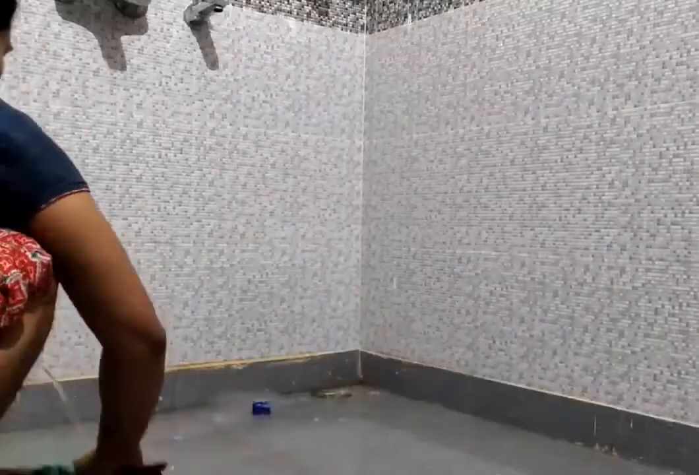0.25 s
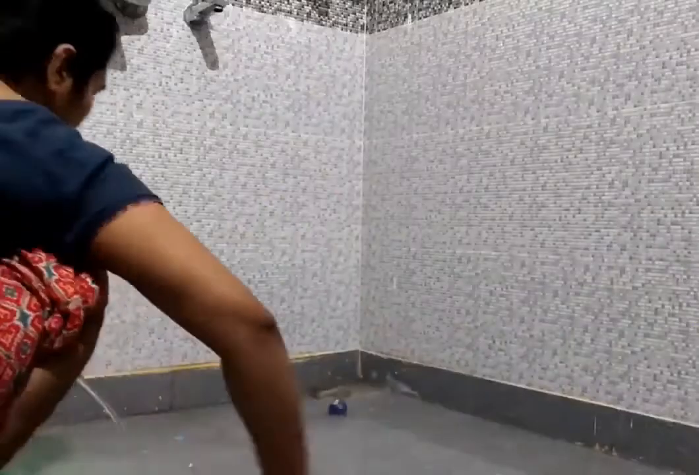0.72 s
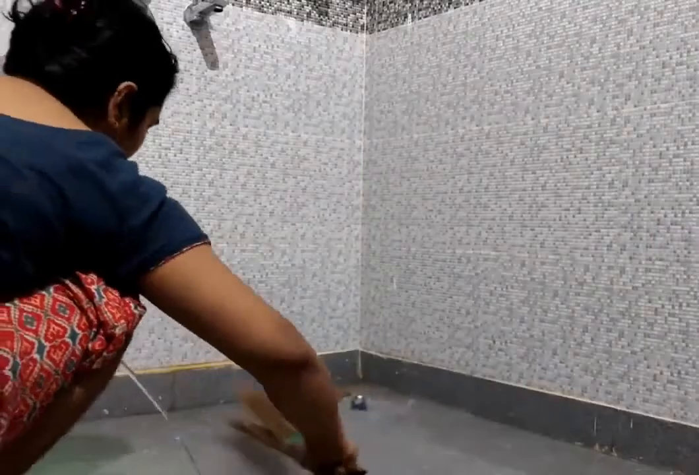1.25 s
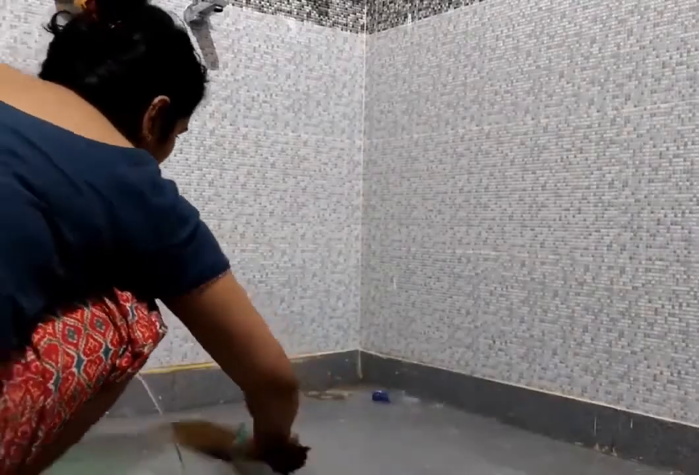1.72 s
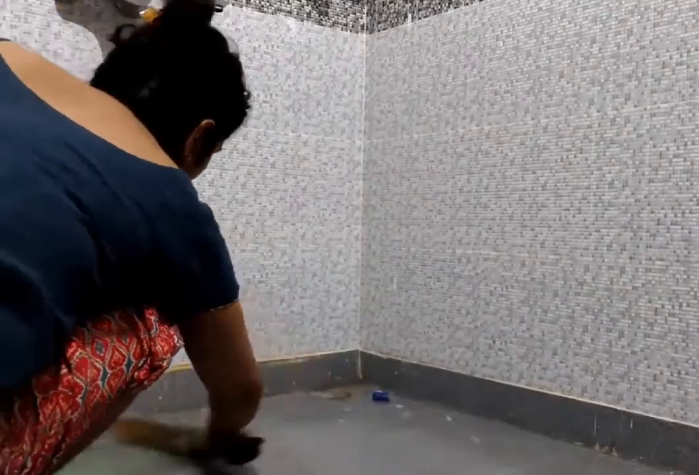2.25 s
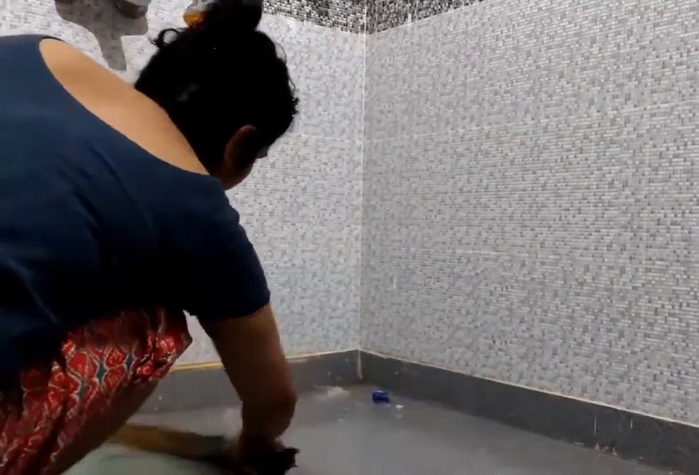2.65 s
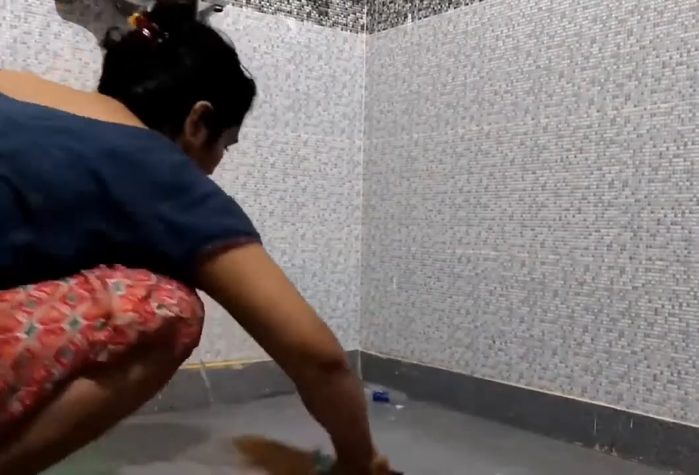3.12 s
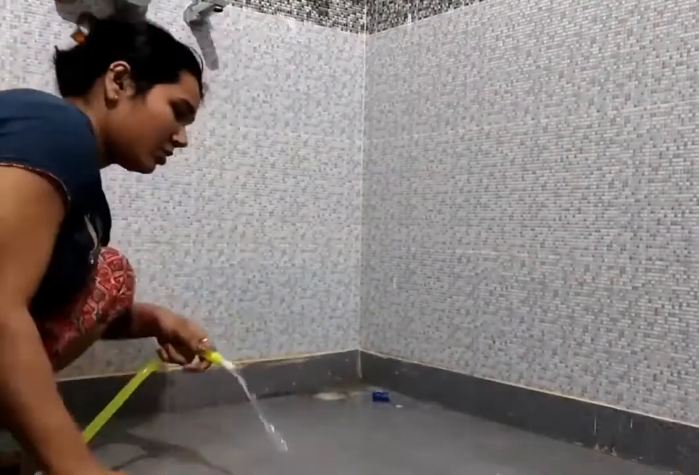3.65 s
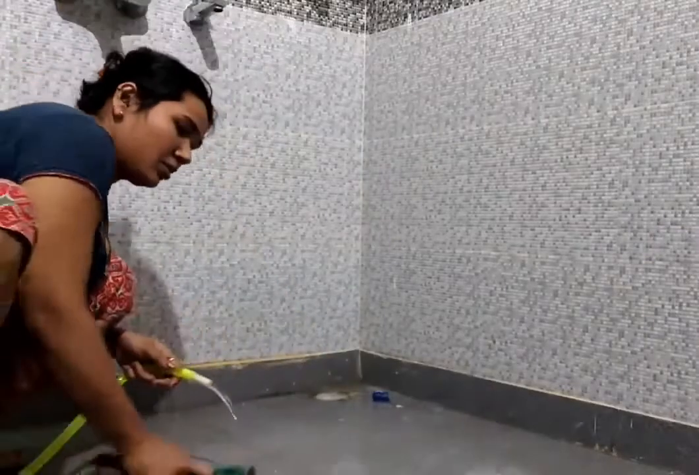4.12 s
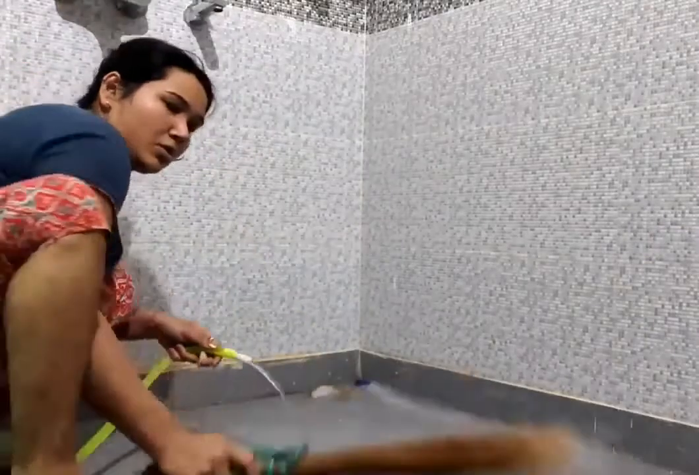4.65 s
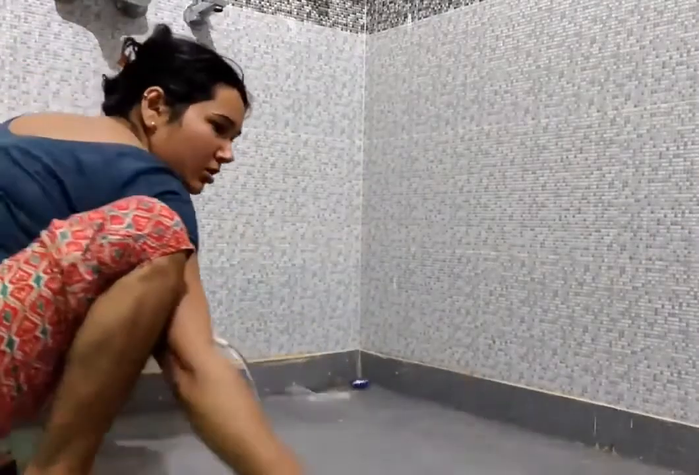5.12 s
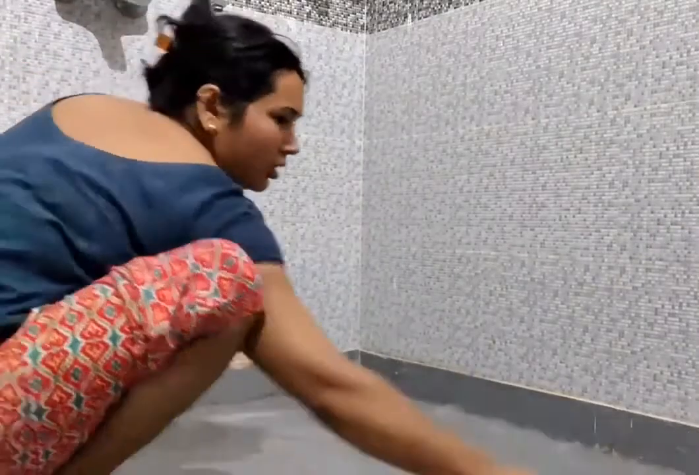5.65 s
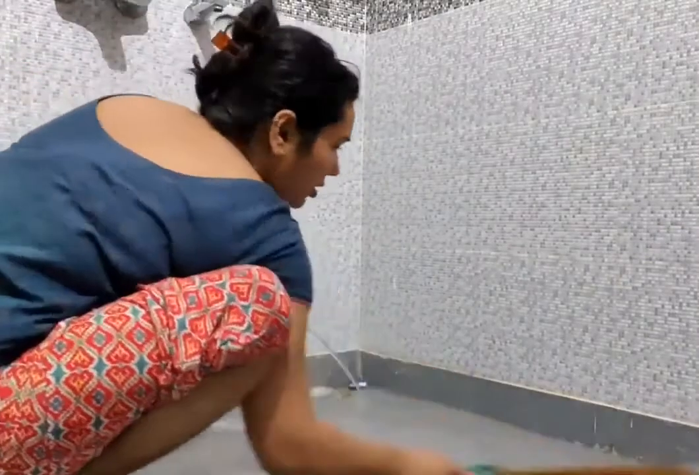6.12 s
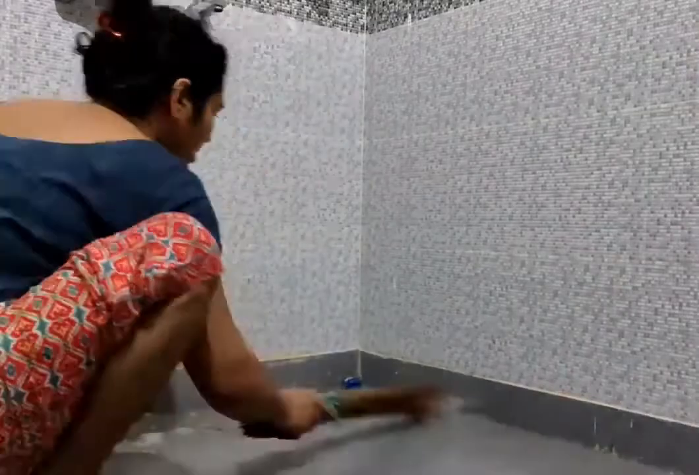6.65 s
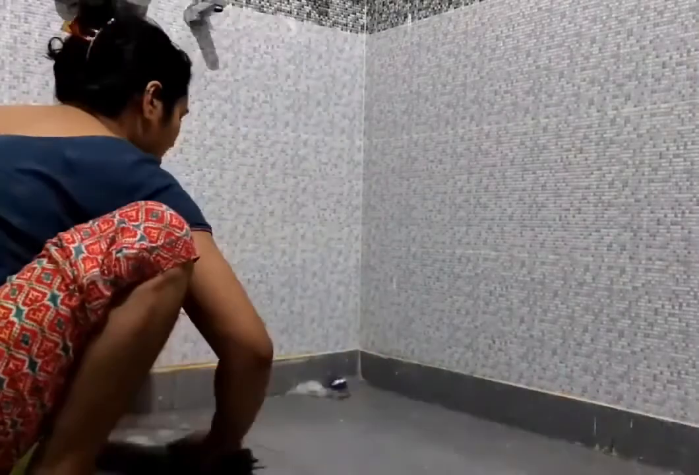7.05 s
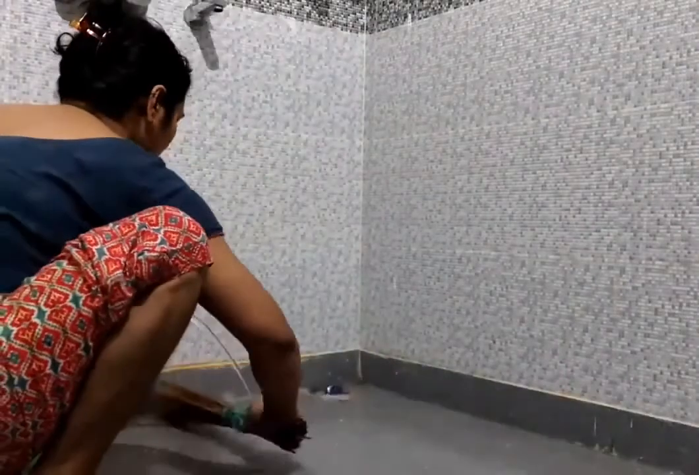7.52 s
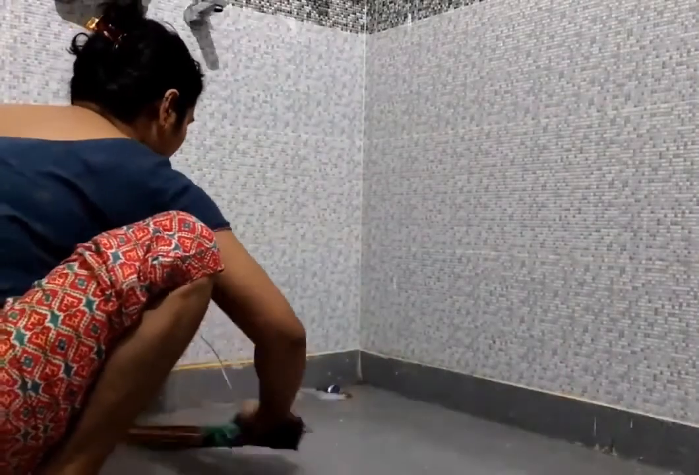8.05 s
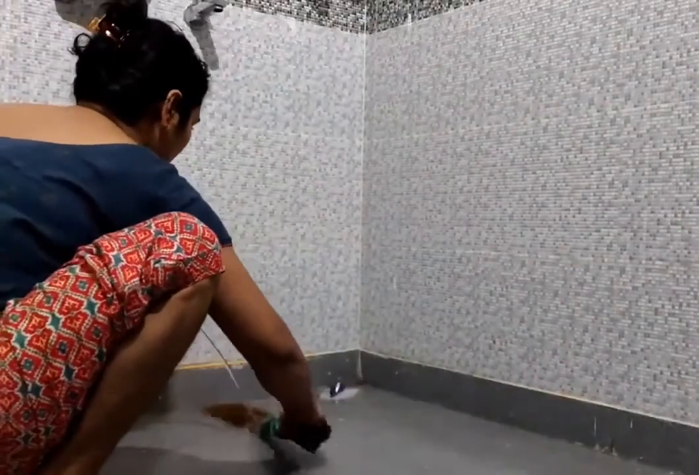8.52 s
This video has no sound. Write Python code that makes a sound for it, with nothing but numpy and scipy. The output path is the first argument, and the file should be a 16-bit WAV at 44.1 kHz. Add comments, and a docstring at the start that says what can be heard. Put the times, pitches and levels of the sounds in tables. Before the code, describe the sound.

A stiff broom scrubs a wet tiled bathroom floor in repeated scratchy strokes, with a faint hose trickle, handle knocks and a low room hum.

```python
"""A stiff broom scrubs a wet tiled bathroom floor in long strokes while a hose trickles beside it.
From the start, thousands of random clicks, shaped by each stroke, make the bristles; pattering
clicks and ringing bubbles make the hose, and decaying noise makes the bare walls ring on.
Three wavering low notes of the room and a rumble hum under it all. Between about 3.4 and 5.1 s two
faint tones swell and fade, and from 3.7 to 5.9 s the handle knocks the floor: low modes and noise."""
import sys
import numpy as np
from scipy import signal
from scipy.fft import rfft, irfft, next_fast_len
from scipy.io import wavfile
from scipy.ndimage import uniform_filter1d, map_coordinates

SR = 44100
rng = np.random.default_rng(int(sys.argv[2]) if len(sys.argv) > 2 else 0)


def generate_wav(signal):
    """Clip the signal to [-1, 1] and save it as 16-bit WAV at the path in sys.argv[1]."""
    frames = np.transpose(np.atleast_2d(signal))
    scaled = np.clip(frames, -1, 1) * 32767
    pcm = np.round(scaled).astype(np.int16)
    wavfile.write(sys.argv[1], SR, pcm)


N = 387638  # length of the scene in samples

# Broom strokes: (bite [s], rise before the bite [s], drag after it [s], extra push in the drag [dB/s],
# low rasp of the pressed bundle [dB], scrub [dB], wet spray on top [dB])
STROKES = [(0.0, .1, 0, 0, -38.5, -25, -36), (.338, 0.23, 0.15, 3, -51, -24, -34),
           (.82, 0.16, 0.31, 1, -46, -23.5, -33.5), (1.603, 0.12, 0.25, -2.5, -45.5, -22.5, -34.5),
           (2.15, 0.14, 0.45, -4.5, -50, -23, -32), (2.69, 0.16, 0.27, -7, -48.5, -25.5, -33.5),
           (3.095, 0.24, 0.12, -1, -42.5, -25.5, -34), (3.791, 0.062, 0.069, 3, -47, -32, -38),
           (3.9, 0.12, 0.36, -1, -46.5, -22, -34), (4.431, 0.45, 0.0043, 7, -45, -34, -40.5),
           (4.915, 0.031, 0, 12, -51.5, -35, -41), (5.035, 0.1, 0.41, 1, -48, -24, -32.5),
           (5.738, 0.064, 0, 1, -37.5, -27, -36.5), (5.9, 0.15, 0.25, 9, -45.5, -25, -35),
           (6.2, 0.29, 0.11, -2, -42.5, -25.5, -39), (6.62, 0.29, 0, 11, -52, -26, -34.5),
           (7.015, 0.09, 0.2, 9, -49, -30.5, -39), (7.23, 0.33, 0.18, -10, -43.5, -26.5, -41.5),
           (7.775, .2, 0.085, 8, -44, -25.5, -36), (8.178, 0.14, 0.11, 14, -46.5, -24.5, -34.5),
           (8.552, 0.25, 0.016, 3, -49, -25.5, -36)]
# Brief digs as the bristles catch in a joint: (time [s], change of the stroke [dB])
DIGS = [(.35, 2), (.4, 2.5), (.86, 2.5), (1.0, -1), (1.15, 0), (1.63, 2.5), (1.75, 0.5), (1.9, 2),
        (2.16, 2), (2.22, -1), (2.65, 3), (2.7, 1), (2.765, 2.5), (2.95, -1), (3.115, 2), (3.155, 0.5),
        (3.2, -4), (3.9, 0.5), (3.979, 1.5), (4.1, 1), (4.27, 2.5), (5.04, -0.5), (5.15, 1.5), (5.28, 0),
        (5.37, 2.5), (5.8, 1), (6.1, -2.5), (6.23, .8), (6.635, 2), (6.67, 2.5), (7.25, 2), (7.45, 3.5),
        (7.84, 3), (8.33, 0.5)]
# Tone colour of the bristle snaps: (frequency [Hz], relative level [dB])
BRISTLE_COLOUR = [(88, -55), (150, -22), (200, -32), (274, -26.5), (345, -24.5), (779, -10.5), (1010, -9),
                  (1270, -5.5), (1380, -6), (2320, -2), (4920, -6), (5990, -9.5), (7400, -6), (9620, -19),
                  (16300, -120)]
# Tone colour of the hose's patter: (frequency [Hz], relative level [dB])
TRICKLE_COLOUR = [(150, -42), (330, -11.5), (500, -9.5), (1200, -31), (1700, -2), (2400, -2), (4900, -8),
                  (7400, -38)]
# How long the walls ring: (frequency [Hz], time to fall by 60 dB [s])
WALL_RING = [(150, 1), (600, 0.37), (2500, 0.62), (7000, 0.12), (15000, 0.014)]
# How alike the echoes are at left and right: (frequency [Hz], likeness [-1 to 1])
ECHO_LIKENESS = [(60, 1), (130, 1), (290, 0.5), (640, 0.33), (1400, -0.28), (3000, 0.0039), (15000, 0.13)]
# Direct sound compared with the echoes: (frequency [Hz], level [dB])
DIRECT = [(500, -7.5), (3000, -13), (7000, -8.5), (15000, -4.5)]
# Tone colour of the deepest noise: (frequency [Hz], relative level [dB])
DEEP_COLOUR = [(10, 0), (22, 8), (32, -6), (45, -20), (75, -23), (120, -18), (200, -34)]
# Tone colour of the distant rumble: (frequency [Hz], relative level [dB])
RUMBLE_COLOUR = [(100, -28), (126, -9), (135, 6), (141, -6), (147, 6), (156, -4.5), (167, 3), (180, -4),
                 (220, -6.5), (300, -9), (420, -24)]
# Loudness of the distant rumble: (time [s], level [dB])
RUMBLE_LEVEL = [(0.0, -61), (0.7, -65), (1.3, -60.5), (2.3, -62), (3.1, -51.5), (3.8, -56), (4.05, -66),
                (4.6, -54), (5.4, -60.5), (6.0, -44.5), (6.65, -59), (7.07, -53), (7.3, -74), (7.76, -56),
                (8.15, -73), (8.5, -55), (8.79, -70)]
# Loudness of each low note of the room, before it wavers: (time [s], level [dB])
LOW_NOTE = [(0.0, -76), (0.07, -60), (0.44, -70), (0.46, -61), (1.52, -61), (1.81, -71), (1.86, -56),
            (1.93, -73), (2.01, -55), (2.3, -70), (2.37, -62), (3.03, -57), (3.13, -52), (3.31, -61),
            (3.77, -48), (4.02, -68), (4.21, -52), (4.65, -55), (5.31, -72), (5.39, -55), (5.75, -60),
            (5.92, -50), (6.14, -64), (6.73, -67), (8.25, -51.5), (8.79, -62)]
MID_NOTE = [(0.0, -66), (0.68, -63), (1.96, -79), (2.13, -53), (2.32, -74), (2.689, -59), (4.43, -71),
            (4.73, -64), (5.53, -69), (5.68, -67), (6.98, -64), (7.1, -51), (7.3, -53), (7.51, -54.5),
            (8.79, -62)]
TOP_NOTE = [(0.0, -59), (0.12, -50), (0.51, -61), (0.66, -52.5), (1.1, -67), (1.17, -58), (1.52, -54.5),
            (1.69, -69), (1.91, -55), (2.32, -66), (2.5, -57), (3.26, -55), (3.42, -66), (3.62, -52),
            (3.82, -55), (4.16, -84), (4.26, -63), (4.85, -62), (5.29, -82), (5.39, -68), (5.7, -56),
            (5.8, -69), (5.88, -60), (6.44, -53), (7.07, -63), (7.22, -53.5), (8.69, -53), (8.79, -56)]
# Faint thin tones: (start [s], end [s], frequency [Hz], level [dB])
TONES = [(4.55, 5.07, 319, -53.5), (3.36, 3.7, 855, -57)]
# Handle knocks: (time [s], blow [dB], softness: loss per octave away from the main mode [dB],
# dull thud compared with the ring [dB])
KNOCKS = [(3.738, -27, 11, -22), (3.755, -29, 17, -21), (3.812, -40, -2, -16), (3.882, -31.5, 14, -29),
          (4.035, -40, 12, -29), (4.824, -37, 7, -10), (5.724, -17, 1, -17), (5.797, -27, 0, -18),
          (5.839, -29, 4, -18), (5.89, -28, 4, -17)]
# Ringing of floor and room under a knock: (frequency [Hz], level [dB], time to fall by 60 dB [s])
KNOCK_MODES = [(136.7, -4, 0.69), (148, -10, 1.0), (166, -9, 1.4), (203, -0.5, 1.1), (240, 5, 0.18),
               (264, 9, 0.17), (280.7, 10, 0.32), (309, -4.5, 0.97), (350, -15, 0.28), (409, -11, 0.4),
               (458, -9, 0.6), (526, 2.5, 0.6), (574, -4, 0.85), (786, -2, 0.62)]
# Left minus right: (frequency [Hz], difference [dB])
BALANCE = [(60, 1), (130, 0), (280, 2.5), (700, 0.4), (3000, 0.56)]
# Overall tone colour, with a narrow dip near 8 kHz, fuller treble above it, falling away past 15 kHz:
# (frequency [Hz], level [dB])
OVERALL_COLOUR = [(7400, 2), (7650, -0.5), (7950, -16.5), (8350, -4), (9500, 6.5), (11000, 5), (13000, 6.5),
                  (15000, 6), (15300, 4), (15800, -8)]

# Bristles: snaps of the thickest kind, single stiff twigs springing free, brightening
SNAPS_PER_S, SNAP_SPREAD_DB = 1800, 3.0
FLICKS_PER_S, FLICK_SHARE = 220, .3
BRIGHT_PER_DB = 0.25  # for each dB of spray over scrub
# Tufts scratch unevenly, each in its own range of pitch and time
PATCH_DB, PATCH_HZ, PATCH_S = 1.8, 800, .009
# Stroke shape; groups of three are for rasp, scrub and spray
RISE_DB, DIG_S = 20, 0.016  # climb over the rise, half length of a dig
LAG_S = -0.021, .001, -0.0013
DRAG_DB_PER_S = 14.5, -5.5, -15  # the bundle presses harder while the water is swept away
LIFT_DB_PER_S = -26.5, -44.5, -51
REST_DB = -58, -54, -63  # bristles creeping between strokes
UNEVEN_DB = .5, 0.3, .7  # chance lumps
# Hose
TRICKLE_DB, BUBBLES_DB = -46.5, -50.5
BUBBLES_PER_S, BUBBLE_SPREAD_DB = 60, 1.5
# Room and upper limit of the sound
LEAD_IN_DB = 3  # the stroke was stronger just before the start
DEEP_DB = -62
HUM_HZ = 60, 84, 101.2
HUM_WAVER = .022, .015, .008  # share of the pitch, for each note
EDGE_HZ = 15880


def amp(db):
    """Turns decibels into a plain multiplier."""
    return 10 ** (np.asarray(db) / 20)


def evened(x):
    """Brings a signal to an average (RMS) strength of one."""
    return x / np.sqrt(np.mean(x ** 2) + 1e-20)


def read(points, hz):
    """Reads a frequency table at any frequency, with pitch spaced by octaves."""
    f, value = np.transpose(points)
    return np.interp(np.log(hz + 1), np.log(f + 1), value)


def coloured(x, points):
    """Makes each frequency louder or softer by a (frequency [Hz], level [dB]) table."""
    length = x.shape[-1]
    size = next_fast_len(length)
    gain = amp(read(points, np.fft.rfftfreq(size, 1 / SR)))
    return irfft(rfft(x, size) * gain, size)[..., :length]


def wander(seconds):
    """Drifts by chance, with straight lines between random points this many seconds apart."""
    knots = rng.standard_normal(int(N / SR / seconds) + 3)
    return evened(map_coordinates(knots, [np.arange(N) / SR / seconds], order=1))


def snaps(per_s, spread_db):
    """Scatters sparse clicks of random sign, a few much larger than the rest."""
    size_db = spread_db * np.minimum(rng.exponential(1, N), 5)
    size = amp(size_db) * rng.choice([-1., 1.], N)
    return size * (rng.random(N) < per_s / SR)


def by_stiffness(per_s, spread_db, count=5):
    """Thick and thin bristles snap independently: the thinner, the higher and the more often."""
    size = next_fast_len(N)
    flicks = FLICK_SHARE * evened(snaps(FLICKS_PER_S, spread_db))
    log_hz = np.log(np.fft.rfftfreq(size, 1 / SR) + 1)
    place = np.interp(log_hz, np.log([1000, 12000]), [0, count - 1])
    total = 0
    for k in range(count):
        clicks = evened(snaps(per_s * 1.8 ** k, spread_db) * amp(0.46 * wander(.006)))
        # the same flicks reach every kind but the thickest, more strongly in the thinner ones
        clicks = clicks + flicks * k / count
        pitch_range = np.cos(np.pi / 2 * np.clip(place - k, -1, 1))
        total = total + rfft(clicks, size) * pitch_range
    return irfft(total, size)[:N]


def stroke_levels(t):
    """Each stroke rises, drags and lifts off; rasp, scrub and spray do so at their own rates."""
    bite, rise, drag, push_db, *peaks_db = np.transpose(STROKES)[..., None]
    digs_db = sum(db * np.exp(-((t - s) / DIG_S) ** 2) for s, db in DIGS)
    levels_db = []
    for peak_db, lag, drag_db, lift_db, rest_db in zip(
            peaks_db, LAG_S, DRAG_DB_PER_S, LIFT_DB_PER_S, REST_DB):
        since_bite = t - bite - lag
        rising = RISE_DB * np.minimum(since_bite, 0) / np.maximum(rise, .01)
        dragging = (drag_db + push_db) * np.clip(since_bite, 0, abs(drag))
        lifting = lift_db * np.maximum(since_bite - abs(drag), 0)
        strokes = amp(peak_db + rising + dragging + lifting)
        power = (strokes ** 2).sum(0) + amp(rest_db) ** 2
        levels_db.append(10 * np.log10(power) + digs_db)
    return levels_db


def broom():
    """Bristle snaps come in short clumps; rasp, scrub and spray each follow the stroke in their own way."""
    clumps = by_stiffness(SNAPS_PER_S, SNAP_SPREAD_DB) * amp(0.92 * wander(.004))
    x = coloured(clumps, BRISTLE_COLOUR[1:-1])
    hz, t, z = signal.stft(x, SR, nperseg=256)
    smooth_db = stroke_levels(t)
    bright_db = BRIGHT_PER_DB * (smooth_db[2] - smooth_db[1])
    levels_db = [db + np.interp(t * SR, np.arange(N), lump_db * wander(.035))
                 for db, lump_db in zip(smooth_db, UNEVEN_DB)]
    # share the frequencies out among rasp, scrub and spray
    low = read([(1100, 1.0), (1900, 0.054)], hz)
    high = read([(6500, 0.27), (8500, 0.99)], hz)
    shares = low, 1 - low - high, high
    bands_hz = (700, 1192), (1500, 3060), (8400, 15340)
    power = (abs(z) ** 2).mean(1) * 256 / 96
    gain_db = 0
    for share, (lo_hz, hi_hz), db in zip(shares, bands_hz, levels_db):
        band_db = 10 * np.log10(power[(hz > lo_hz) & (hz < hi_hz)].sum())
        gain_db = gain_db + share[:, None] * (db - band_db)
    # quick light sweeps sound brighter, heavy pushes darker
    tilt = read([(1200, -0.87), (1800, -2.1), (3600, 0.14), (6000, 0.98), (8500, 0.39)], hz)
    gain_db += tilt[:, None] * (bright_db - np.median(bright_db))
    # uneven scratching of the tufts
    knots = rng.standard_normal((int(t[-1] / PATCH_S) + 3, int(hz[-1] / PATCH_HZ) + 3))
    grid = np.meshgrid(t / PATCH_S, hz / PATCH_HZ)
    gain_db += PATCH_DB * evened(map_coordinates(knots, grid, order=1))
    return signal.istft(z * amp(gain_db), SR, nperseg=256)[1][:N]


def hose():
    """A thin jet patters on the tiles and traps small bubbles that ring with rising pitch."""
    patter = evened(coloured(snaps(4000, 2.7) * amp(1.4 * wander(0.029)), TRICKLE_COLOUR))
    births = snaps(BUBBLES_PER_S, BUBBLE_SPREAD_DB)
    kind = rng.integers(0, 8, N)  # eight bubble sizes
    bubbles = np.zeros(N)
    t = np.arange(1500) / SR
    for k, hz in enumerate(np.geomspace(1300, 4500, num=8)):
        cycles = hz * t
        swell_and_fade = np.exp(-cycles / 9) * (1 - np.exp(-cycles))
        ring = np.sin(2 * np.pi * cycles * (1 + 0.0059 * cycles)) * swell_and_fade
        bubbles += signal.oaconvolve(births * (kind == k), ring)[:N]
    return amp(TRICKLE_DB) * patter + amp(BUBBLES_DB) * evened(bubbles)


def bathroom(x):
    """The broom keeps moving, so each stretch meets another echo pattern; the walls ring from the start."""
    hop, lead, frames, patterns, size = 2048, 8192, 190, 64, 32768
    # each echo pattern is noise that dies away at the walls' own rate for each frequency
    hz, t = np.fft.rfftfreq(256, 1 / SR), np.arange(frames) * 128 / SR
    decay = amp(-60 * t / read(WALL_RING, hz)[:, None])
    decay /= np.linalg.norm(decay, axis=1, keepdims=True)
    a, b = rng.standard_normal((2, patterns, 2, 129, frames))
    tails = rfft(signal.istft((a + 1j * b) * decay, SR, nperseg=256)[1], size)
    # a mirrored, evenly loud lead-in sets the walls ringing before the start
    padded = np.pad(x, (lead, 2 * hop), "reflect")
    lead_in = padded[:lead]
    lead_level = amp(LEAD_IN_DB) * x[:hop].std()
    padded[:lead] = lead_level * lead_in / np.sqrt(uniform_filter1d(lead_in ** 2, hop))
    fade = np.sqrt(np.hanning(2 * hop))
    wet = np.zeros((2, N + size + 2 * hop + lead))
    for at in range(0, N + lead, hop):
        stretch = rfft(padded[at:at + 2 * hop] * fade, size)
        wet[:, at:at + size] += irfft(stretch * tails[at // hop % patterns], size)
    # join the two sides and add the direct sound
    size = next_fast_len(N)
    f = np.fft.rfftfreq(size, 1 / SR)
    left, other = rfft(evened(wet[:, lead:lead + N]) * x.std(), size)
    same = np.clip(read(ECHO_LIKENESS, f), -1, 1)  # long waves reach both microphones alike
    right = same * left + np.sqrt(1 - same ** 2) * other
    near = amp(read(DIRECT, f))
    both = np.array([left, right]) + near * rfft(x, size)
    return irfft(both / np.sqrt(1 + near ** 2), size)[:, :N]


def hum():
    """Three wavering low notes, alike in both channels, over a rumble that comes and goes."""
    t = np.arange(N) / SR
    noise = rng.standard_normal((3, N))  # left, right, shared
    out = amp(DEEP_DB) * evened(coloured(noise[2] + 0.25 * noise[:2], DEEP_COLOUR))
    rumble = evened(coloured(noise[2] + 0.16 * noise[:2], RUMBLE_COLOUR))
    out += amp(np.interp(t, *np.transpose(RUMBLE_LEVEL))) * rumble
    for hz, waver, level in zip(HUM_HZ, HUM_WAVER, (LOW_NOTE, MID_NOTE, TOP_NOTE)):
        turns = np.cumsum(hz * (1 + waver * wander(.06))) / SR
        level_db = np.interp(t, *np.transpose(level)) + 1.84 * wander(0.076)
        out += np.sqrt(2) * amp(level_db) * np.sin(2 * np.pi * turns)
    return out


def tones():
    """Faint tones of steady pitch that swell and fade."""
    t = np.arange(N) / SR
    out = 0
    for start, end, hz, db in TONES:
        swell = np.sin(np.pi * np.clip((t - start) / (end - start), 0, 1)) ** .5
        out = out + amp(db) * swell * np.sin(2 * np.pi * hz * t)
    return out


def knocks():
    """Each blow rings the same low modes, over a dull noisy thud and a short crack."""
    thud_colour = [(100, -37), (130, 0.0), (300, -5.5), (600, -0.5), (720, -15), (1000, -25)]
    crack_colour = [(700, -32), (1200, 3), (3000, 1), (8000, -24)]
    out, t = np.zeros((2, N)), np.arange(SR) / SR
    for s, db, soft_db, thud_db in KNOCKS:
        ring = 0
        for hz, mode_db, t60 in KNOCK_MODES:
            fading = amp(mode_db - soft_db * abs(np.log2(hz / 280)) - 60 * t / t60)
            ring = ring + fading * np.sin(2 * np.pi * (hz * t + rng.uniform(0, 0.25, (2, 1))))
        noise = rng.standard_normal((3, SR))
        noise = noise[:2] + 1.1 * noise[2]  # partly shared by left and right
        thud = amp(thud_db - 60 * t / 1.22) * evened(coloured(noise, thud_colour))
        crack = amp(thud_db + 11.5 - 60 * t / 0.2) * evened(coloured(noise, crack_colour))
        onset = 1 - np.exp(-t / 0.0037)
        blow = amp(db) * (ring / abs(ring).max() + thud + crack) * onset
        at = round((s - .004) * SR)  # begins 4 ms ahead of the listed time
        part = out[:, at:at + SR]
        part += blow[:, :part.shape[1]]
    return out


def scene():
    """Broom and hose echo in the bathroom; knocks, hum and tones are added as they are."""
    return bathroom(broom() + hose()) + knocks() + hum() + tones()


def record(dry):
    """Overall tone colour with a small left-right imbalance, then the band limit."""
    channels = []
    for channel, side in zip(dry, (1, -1)):
        balance = [(hz, side * db / 2) for hz, db in BALANCE]
        channels.append(coloured(channel, balance + OVERALL_COLOUR))
    band_limit = signal.firwin(4095, EDGE_HZ, window=("kaiser", 9), fs=SR)
    return signal.oaconvolve(np.array(channels), band_limit[None], "same")


dry = scene()
out = record(dry)
generate_wav(out)
```